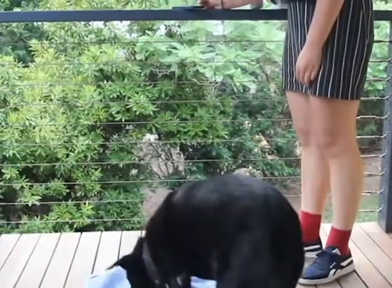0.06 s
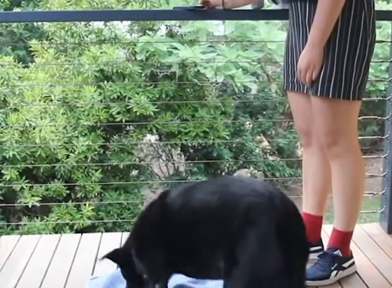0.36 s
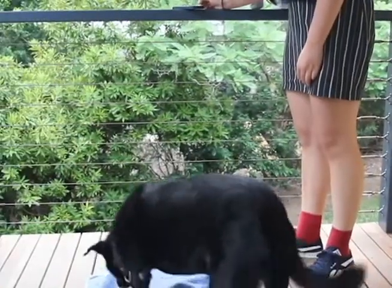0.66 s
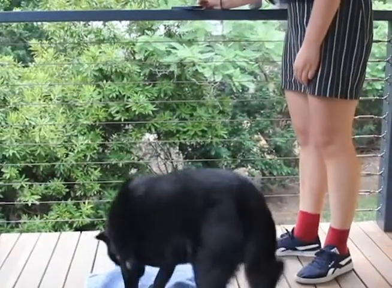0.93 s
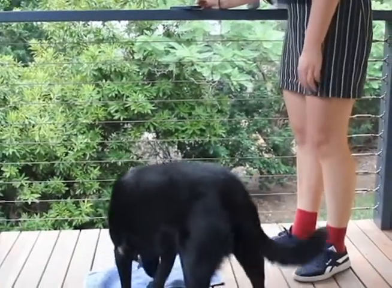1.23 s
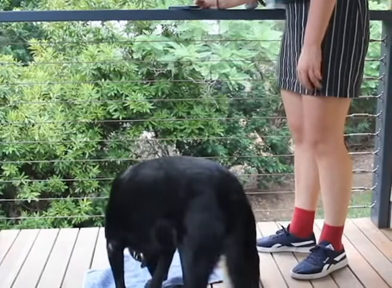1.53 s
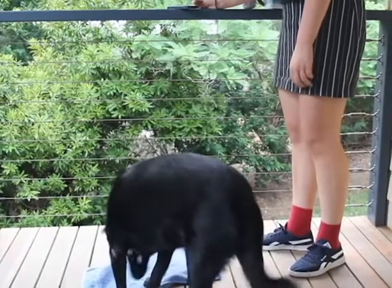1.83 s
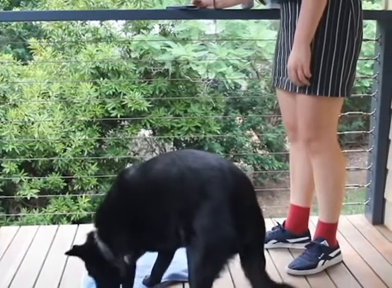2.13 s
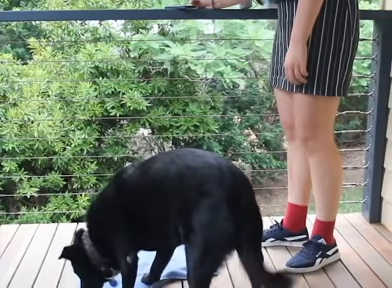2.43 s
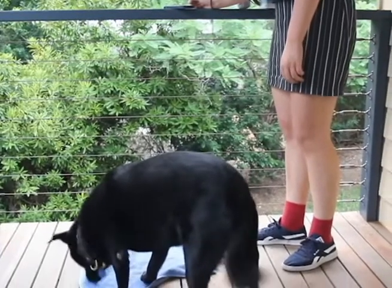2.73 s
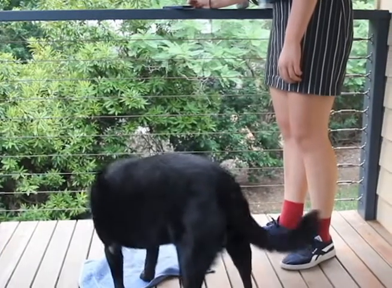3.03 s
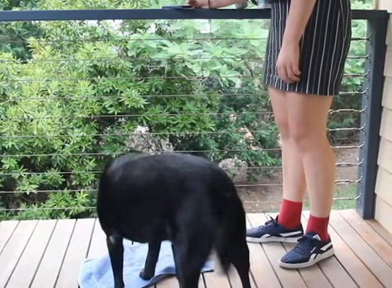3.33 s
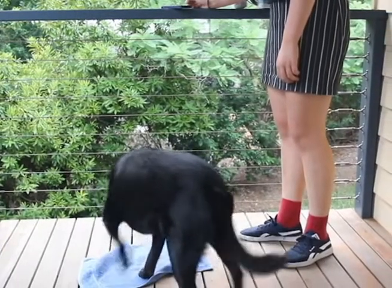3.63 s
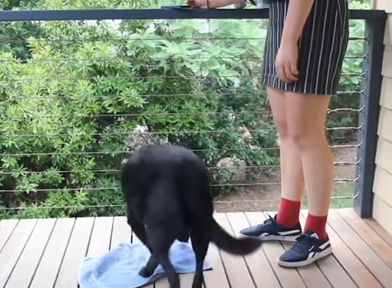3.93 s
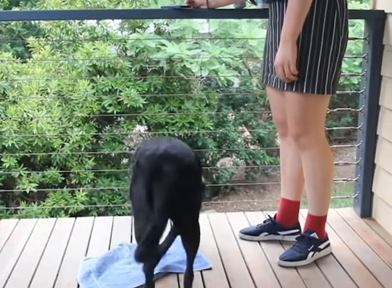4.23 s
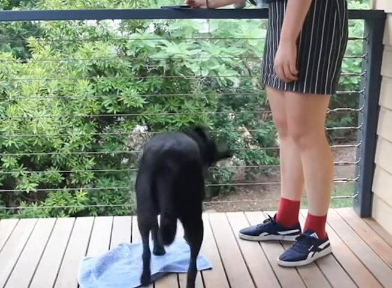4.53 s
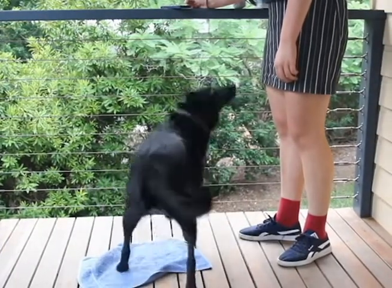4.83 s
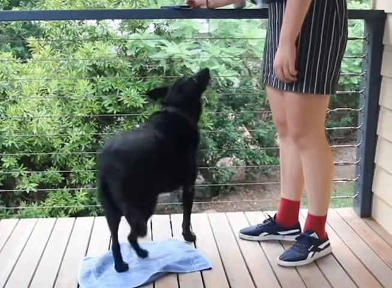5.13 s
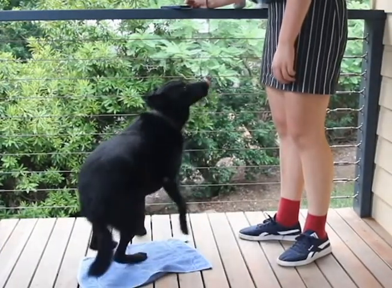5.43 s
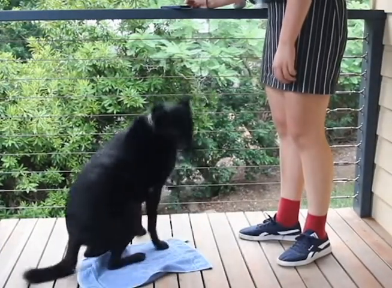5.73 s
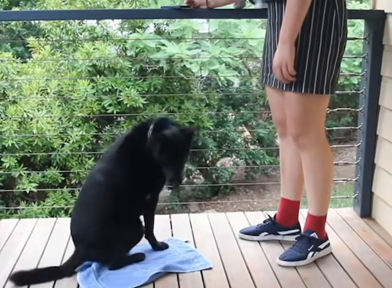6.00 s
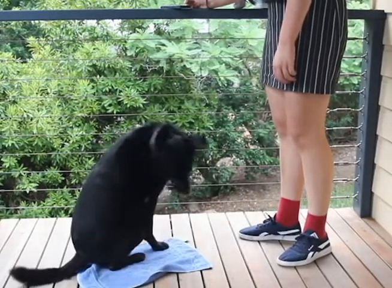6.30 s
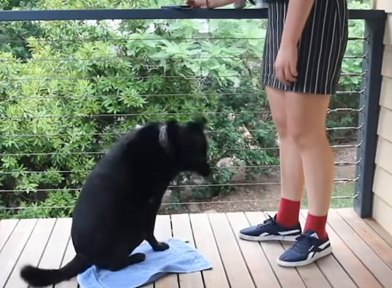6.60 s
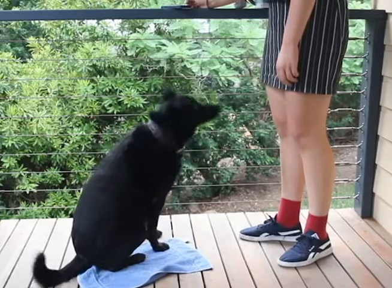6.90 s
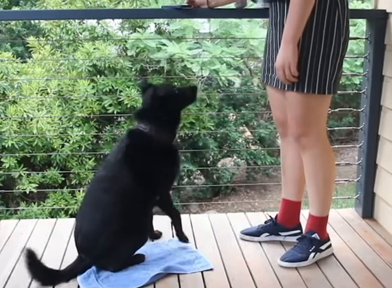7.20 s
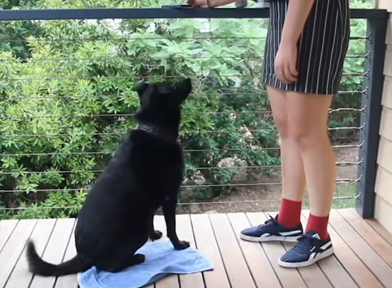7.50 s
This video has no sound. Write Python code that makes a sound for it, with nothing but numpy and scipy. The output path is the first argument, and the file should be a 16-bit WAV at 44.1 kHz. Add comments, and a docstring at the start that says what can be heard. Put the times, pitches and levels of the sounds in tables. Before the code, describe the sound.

Outdoors on a wooden deck, a constant shrill of insects is the loudest sound, with soft open air and a faint machine hum beneath. A collar clinks near the microphone and a far bird whips upward once. A dog's claws click irregularly on the boards, and about seven rough, falling chirps come from the bushes. The dog turns with a short hollow knock and sits with a low thump while the insects carry on.

```python
"""Insects shrill all round a garden deck: a dense high chorus of wing strokes over a lower, pulsing buzz.
Close to the microphone a dog shuffles about and sits down: claws tap the boards, the collar clinks,
its weight booms in the deck. Farther off one bird cracks a rising whip note, one holds a thin whistle,
and another scolds from the bushes in falling chirps. Distant machinery hums under the open air."""
import sys
import numpy as np
from scipy import signal
from scipy.fft import rfft, irfft
from scipy.io import wavfile
from scipy.ndimage import uniform_filter1d

SR = 44100
rng = np.random.default_rng(int(sys.argv[2]) if len(sys.argv) > 2 else 0)


def master_out(mix):
    """Clip the mix to full scale and print it as 16-bit PCM to the path in sys.argv[1]."""
    frames = np.transpose(np.atleast_2d(mix))
    ceiling = np.clip(frames, -1, 1)
    pcm = np.round(ceiling * 32767).astype(np.int16)
    wavfile.write(sys.argv[1], SR, pcm)


N = 337655
TIME = np.arange(N) / SR


def high_chorus(start_db=-27, ease_db_per_s=0.1523, flutter_db=0.07):
    """Countless wing strokes fuse into one shrill band; a few singers nearer the microphone stand out."""
    # the massed insects' spectrum: (frequency [Hz], density [dB])
    shrill = [(5200, -38.5), (6000, -26.5), (6400, -15.5), (6700, -6), (7050, -2), (7550, 0), (7950, -4),
              (8350, -9.5), (8700, -19.5), (9200, -34.5), (10300, -34.5), (11600, -33), (12300, -44.5),
              (13000, -49.5)]
    # the nearer insects: (pitch [Hz], width [Hz], level [dB])
    soloists = [(7840, 6.7, -42.5), (7760, 25, -61), (7720, 29, -43), (7460, 5.3, -53), (7040, 13, -45),
                (6930, 20, -61), (6720, 11.3, -53.5), (8670, 7, -55.5), (3692, 8.8, -59),
                (3527, 5.7, -60.5)]
    mass = coloured(rng.standard_normal(N), shrill)
    level_db = start_db - ease_db_per_s * TIME - flutter_db * drift(22)
    return mass * gain_of(level_db) + fuzzy_tones(soloists)


def low_chorus(pulse_hz=105, pulse_depth=0.26, body_hz=3786, start_db=-46.5, drop_db=5.5):
    """One insect's rapid pulses ring its body, over the blur of its neighbours."""
    # the band the buzz fills: (frequency [Hz], gain [dB])
    band = [(2900, -41), (3300, -12), (3550, -3.5), (4000, -2), (4250, -3), (4600, -8), (5400, -27)]
    cycle = angle(pulse_hz * (1 + 0.0066 * drift(6))) / (2 * np.pi) % 1
    pulses = evened(np.exp(-cycle / 0.39))
    drive = rng.standard_normal(N) * (1 + pulse_depth * pulses)
    buzz = coloured(resonate(drive, body_hz, width=750), band)
    level_db = start_db - drop_db * ramp(TIME, 3.25, 6.8)  # drops back in one slow step
    return buzz * gain_of(level_db)


def sizzle(start_s=4.6, after_one_second_db=-64.5):
    """A faint sizzle sets in late under the insects and grows steadily."""
    growth = np.maximum(TIME - start_s, 0)
    return noise_band(N, hz=2910, width=650) * gain_of(after_one_second_db) * growth


def paws(breadth=1.42, rise_s=0.00075, claw_db=1.5, click_t60=0.011):
    """Each claw clicks down, then scrapes briefly on a damped board."""
    # firm taps: (time [s], relative level [dB], resonance [Hz], t60 [s])
    firm_taps = [(0.213, -41, 1900, 0.035), (1.021, -41.5, 1900, 0.073), (1.414, -42, 2000, .09),
                 (1.754, -40, 2280, .085), (1.849, -41.5, 2400, .06), (1.972, -45, 1500, .12),
                 (2.098, -42.5, 1900, .05), (2.123, -41.5, 2000, .05), (2.239, -46, 2110, .16),
                 (2.274, -41.5, 1720, 0.1), (3.625, -39.5, 1910, 0.062), (3.843, -48, 1120, .18),
                 (3.918, -46, 2400, 0.17), (4.521, -41, 1900, .05), (4.966, -45, 2300, 0.041),
                 (5.353, -44, 2170, .17), (5.456, -40.5, 2370, .078), (6.219, -41, 1900, .065)]
    # what a struck board gives out: (frequency [Hz], gain [dB])
    board = [(250, -16), (600, 0), (1100, 4), (2500, -3.5), (5000, 1.5), (8000, 0), (15000, -16)]
    out, t = np.zeros(N), np.arange(SR // 4) / SR
    for s, db, hz, t60 in firm_taps + light_taps():
        scrape = coloured(noise_band(len(t), hz, breadth * hz), board)
        fade = decay(t, t60) + decay(t, click_t60)
        add(out, s, gain_of(db + claw_db) * attack(t, rise_s) * fade * scrape)
    return out


def light_taps(per_s=11, relative_db=-50, spread_db=5.0, hz=1550, t60=0.087):
    """Loosely spaced taps as the dog shifts its feet, in rows like the firm taps."""
    # spells of shuffling: (start [s], end [s])
    shuffles = [(1.04, 1.22), (1.77, 1.85), (3.93, 4.01), (5.76, 6.02)]
    rows = []
    for start, end in shuffles:
        for slot in np.arange(start, end, 1 / per_s):
            late, force = rng.random(2)
            rows.append((slot + .5 * late / per_s, relative_db + spread_db * (2 * force - 1), hz, t60))
    return rows


def knock(at_s=4.542, db=-26.5, hz=986, rattle_db=-10.5):
    """One damped, hollow knock with a short, dull rattle as the dog turns round."""
    out, t = np.zeros(N), np.arange(SR // 4) / SR
    ring = decay(t, t60=.04) * np.sin(2 * np.pi * hz * t)
    rattle = gain_of(rattle_db) * decay(t, t60=.16) * noise_band(len(t), hz=1100, width=1100)
    add(out, at_s, gain_of(db) * attack(t, rise_s=.002) * (ring + rattle))
    return out


def thuds(weight_db=9):
    """The dog's weight booms in the deck."""
    # booms of the boards: (time [s], relative level [dB], pitch [Hz], t60 [s])
    booms = [(3.86, -55, 52, 0.35), (5.50, -48, 64, 0.32)]
    out, t = np.zeros(N), np.arange(SR // 2) / SR
    for s, db, hz, t60 in booms:
        envelope = attack(t, rise_s=.02) * decay(t, t60)
        add(out, s, gain_of(db + weight_db) * envelope * np.sin(2 * np.pi * hz * t))
    return out


def collar(scrape_db=-8.5):
    """Close by, the collar's metal ring scrapes and chimes and its buckle ticks."""
    # clinks of the ring: (time [s], level [dB])
    clinks = [(.008, -34), (.295, -55), (.896, -45), (1.146, -52), (1.412, -48.5), (3.157, -45.5),
              (4.959, -38)]
    # the ring's modes: (frequency [Hz], relative level [dB], t60 [s])
    modes = [(9600, -9, .08), (10075, 3.5, 0.091), (11300, -13, .06), (13630, -13, .11)]
    # dry ticks of the buckle: (time [s], level [dB])
    ticks = [(.292, -50), (.902, -53), (1.414, -53), (1.764, -52), (1.854, -47), (2.279, -47), (3.143, -53),
             (6.682, -52)]
    out, t = np.zeros(N), np.arange(SR // 4) / SR
    chime = sum(gain_of(db) * decay(t, t60) * np.sin(2 * np.pi * hz * t) for hz, db, t60 in modes)
    for s, db in clinks:
        scrape = gain_of(scrape_db) * decay(t, t60=.08) * noise_band(len(t), hz=10560, width=3000)
        add(out, s, gain_of(db) * attack(t, rise_s=.0005) * (chime + scrape))
    for s, db in ticks:
        add(out, s, gain_of(db) * decay(t, t60=.042) * noise_band(len(t), hz=11500, width=11000))
    return out


def pips(sag=0.073):
    """Brief, rough squeaks near the deck, each falling slightly."""
    # squeaks: (time [s], length [s], pitch [Hz], level [dB])
    squeaks = [(.706, 0.019, 2610, -47.5), (.972, .018, 2630, -44), (.972, .018, 1680, -41.5),
               (3.721, .025, 1835, -38.5), (4.122, 0.037, 2120, -48.5), (4.958, 0.015, 1710, -43.5)]
    out = np.zeros(N)
    for s, length, hz, db in squeaks:
        progress = np.linspace(0, 1, int(length * SR))
        pitch = hz * (1 + sag * (.5 - progress)) * rasp(len(progress), depth=0.08)
        add(out, s, gain_of(db) * np.sin(np.pi * progress) * np.sin(angle(pitch)))
    return out


def scolding(overtone_db=-14, upper_ratio=1.42, upper_db=-4, hold_db=-10.5):
    """A bird's rough two-voiced chirps: each dives, hooks back up and dies away on that pitch."""
    # chirps from the bushes: (time [s], level [dB], lowest pitch [Hz])
    chirps = [(2.485, -39, 1710), (2.716, -38.5, 1758), (2.933, -39.5, 1757), (3.138, -39, 1770),
              (3.336, -40, 1720), (3.527, -40.5, 1710), (3.714, -47.5, 1520)]
    dive_s, hook_s, hold_s, rise_s, release_s = .02, .0153, .055, .00934, .0034
    dive, hook = .5, .33  # heights as shares of the lowest pitch
    hook_end = dive_s + hook_s
    out, t = np.zeros(N), np.arange(int((hook_end + hold_s) * SR)) / SR
    contour = 1 + dive * (1 - ramp(t, 0, dive_s) ** 2) + hook * ramp(t, dive_s, hook_end)
    body = 1 - ramp(t, hook_end - release_s, hook_end)
    lower_voice = ramp(t, 0, rise_s) ** 2 * (body + (1 - body) * gain_of(hold_db))
    # the second side of the syrinx sounds only in the dive
    upper_voice = gain_of(upper_db) * (1 - ramp(t, dive_s - release_s, dive_s + release_s))
    envelope = signal.windows.tukey(len(t), .1) * decay(t, t60=1.0)
    for s, db, hz in chirps:
        phase = angle(hz * contour * rasp(len(t), depth=.065))
        note = lower_voice * np.sin(phase) + gain_of(overtone_db) * body * np.sin(2 * phase)
        note += upper_voice * np.sin(upper_ratio * phase)
        add(out, s, gain_of(db) * envelope * note)
    return out


def whip(start_s=.335, length_s=.116, low_hz=750, top_hz=3780, runaway_s=.0235):
    """A bird's low whistle swells as its pitch runs away upward, then cracks off."""
    crack_db, swell_db_per_s, release_s = -38, 160, .018
    out, left_s = np.zeros(N), np.arange(length_s, 0, -1 / SR)
    hz = low_hz + (top_hz - low_hz) * np.exp(-left_s / runaway_s)
    phase = angle(hz * rasp(len(left_s), depth=.04))
    level = gain_of(crack_db - swell_db_per_s * left_s) * ramp(left_s, 0, release_s)
    add(out, start_s, level * np.sin(phase))
    return out


def whistle(start_s=0.067, length_s=.15, hz=2940, db=-56):
    """A far bird holds one thin, level note."""
    out, t = np.zeros(N), np.arange(0, length_s, 1 / SR)
    add(out, start_s, gain_of(db) * signal.windows.tukey(len(t)) * np.sin(2 * np.pi * hz * t))
    return out


def machinery(waver_db=1.3, deep_hz=60.5, rest_db=-70):
    """Far machinery drones and hums, and a deep tone swells beneath it."""
    # droning bands: (centre [Hz], width [Hz], level [dB])
    drone = [(250.8, 13.2, -50), (285.5, 22, -51), (238, 44, -58), (611.3, 50, -50), (800, 90, -54),
             (934, 57, -59.5), (1900, 82, -63)]
    # steady tones: (pitch [Hz], level [dB])
    tones = [(100.4, -58), (359.7, -61), (698, -72), (198.8, -67.5)]
    # swells of the deep tone above its resting level: (crest [s], half width [s], level [dB])
    throbs = [(.7, .38, -61.5), (2.25, 0.38, -57.5), (2.95, 0.63, -62)]
    hum = np.zeros(N)
    for hz, db in tones:
        hum += gain_of(db + waver_db * drift(3.29)) * np.sin(angle(hz + .5 * drift(4)))
    swell = sum(gain_of(db) * np.exp(-((TIME - s) / width) ** 2) for s, width, db in throbs)
    deep = (gain_of(rest_db) + swell) * np.sin(angle(deep_hz + 0.17 * drift(1.75)))
    return fuzzy_tones(drone) + np.sqrt(2) * (hum + deep)


def open_air(db=-46.5, waver_db=0.22):
    """The soft, broad rush of the outdoors."""
    # the air's spectrum: (frequency [Hz], density [dB])
    spectrum = [(20, -17), (45, -11), (80, -8.5), (150, -0.5), (350, 0), (480, -2.5), (900, -6.5),
                (1300, -7.5), (2300, -14.5), (3100, -15), (4800, -14), (9000, -7), (13000, -27.5),
                (16000, -29.5)]
    return gain_of(db + waver_db * drift(8.7)) * coloured(rng.standard_normal(N), spectrum)


def garden(x, direct_db, early_db, tail_db, early_s, reflections=20):
    """The straight path to the microphone, near reflections, then a tail scattered by the foliage."""
    # how long the garden rings: (frequency [Hz], t60 [s])
    ring_times = [(300, .3), (1200, 0.55), (2300, 0.408), (4000, 0.44), (12000, 0.066)]
    hz, t, bands = signal.stft(rng.standard_normal(SR // 2), SR, nperseg=256)
    tail = signal.istft(bands * decay(t, read(ring_times, hz)[:, None]), SR, nperseg=256)[1]
    echo = gain_of(tail_db) * tail / np.linalg.norm(tail)
    for delay, sign in rng.random(size=(reflections, 2)):
        echo[round(early_s * delay * SR)] += np.sign(sign - .5) * gain_of(early_db) / np.sqrt(reflections)
    echo[0] += gain_of(direct_db)
    return signal.fftconvolve(x, echo)[:N]


def fuzzy_tones(rows):
    """Narrow resonances, each kept ringing by random pushes."""
    f = np.fft.rfftfreq(N, 1 / SR)
    power = 0
    for hz, width, db in rows:
        shape = 1 / (1 + ((f - hz) / (0.77 * width)) ** 2) ** 2
        power = power + gain_of(db) ** 2 * shape / shape.mean()
    return irfft(rfft(rng.standard_normal(N)) * np.sqrt(power), N)


def resonate(x, hz, width):
    """A steep resonance; centre and width in Hz."""
    turn = np.exp(1j * angle(np.full(len(x), hz)))
    pole = np.exp(-np.pi * width / SR)
    envelope = signal.lfilter([(1 - pole) ** 2], [1, -2 * pole, pole * pole], x / turn + 1e-18)
    return 2 * (turn * envelope).real


def noise_band(count, hz, width):
    """Noise through one resonance, at rms 1."""
    return evened(resonate(rng.standard_normal(count), hz, width))


def coloured(x, points):
    """Shapes the spectrum of x, at rms 1."""
    gains = gain_of(read(points, np.fft.rfftfreq(len(x), 1 / SR)))
    return evened(irfft(rfft(x) * gains, len(x)))


def read(points, hz):
    """Looks up a table on a log-frequency axis."""
    f, value = np.transpose(points)
    return np.interp(np.log(hz + 1), np.log(f + 1), value)


def rasp(count, depth):
    """A fast random quaver of pitch, as of a bird's membranes."""
    return 1 + depth * evened(uniform_filter1d(rng.standard_normal(count), size=24))


def drift(per_s):
    """A slow random wander of rms 1."""
    return evened(np.interp(TIME * per_s, np.arange(2000), rng.standard_normal(2000)))


def angle(hz):
    """Running phase of a pitch curve."""
    return 2 * np.pi * np.cumsum(hz) / SR


def attack(t, rise_s):
    """Rises from 0 and settles at 1."""
    return 1 - np.exp(-t / rise_s)


def decay(t, t60):
    """Falls 60 dB every t60 seconds."""
    return gain_of(-60 * t / t60)


def ramp(t, start, end):
    """Rises evenly from 0 to 1 between two times."""
    return np.clip((t - start) / (end - start), 0, 1)


def gain_of(db):
    """Decibels to amplitude."""
    return 10 ** (np.asarray(db) / 20)


def evened(x):
    """Scales to rms 1."""
    return x / np.sqrt(np.mean(x ** 2) + 1e-20)


def add(mix, s, sound):
    """Mixes a sound in at time s."""
    part = mix[max(round(s * SR), 0):][:len(sound)]
    part += sound[:len(part)]


def scene():
    """One microphone at the deck: insects all round, the dog close by, birds hidden in the bushes."""
    bushes = garden(scolding(), direct_db=-0.86, early_db=-0.5, tail_db=-4.0, early_s=0.014)
    far_bird = garden(whip(), direct_db=-4, early_db=-11, tail_db=1.5, early_s=0.018)
    deck = garden(paws() + pips(), direct_db=0, early_db=-3.5, tail_db=-5.0, early_s=0.014)
    dog = deck + knock() + thuds() + collar()
    insects = high_chorus() + low_chorus() + sizzle()
    return (insects + dog + bushes + far_bird + whistle() + open_air() + machinery())[None]


def record(dry, edge_hz=15900):
    """The recorder's band limit."""
    lowpass = signal.firwin(511, edge_hz, window=("kaiser", 9), fs=SR)
    return signal.oaconvolve(dry, lowpass[None], "same")


dry = scene()
out = record(dry)
master_out(out)
```